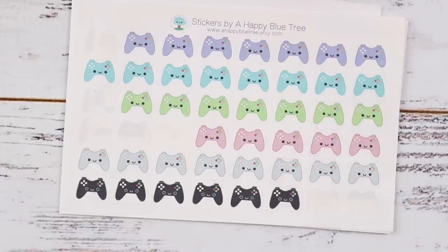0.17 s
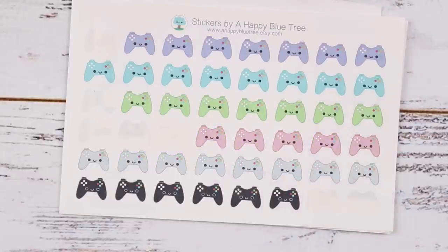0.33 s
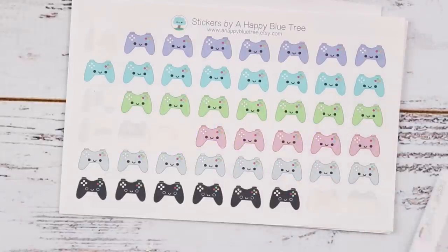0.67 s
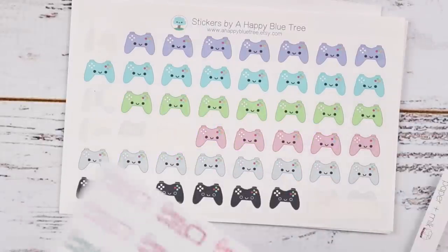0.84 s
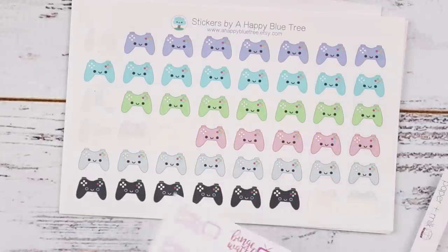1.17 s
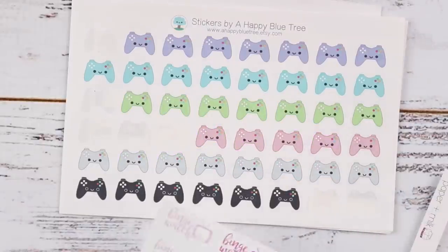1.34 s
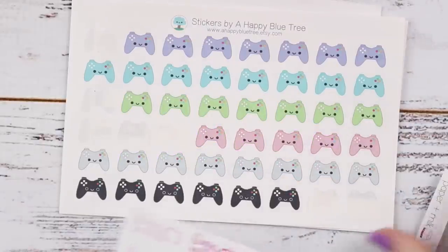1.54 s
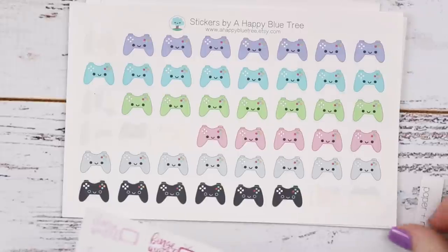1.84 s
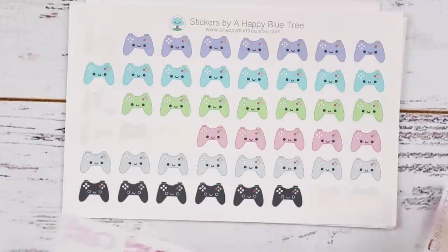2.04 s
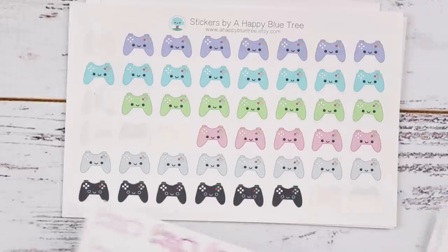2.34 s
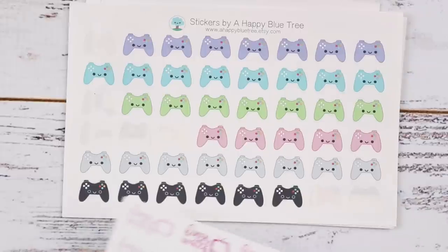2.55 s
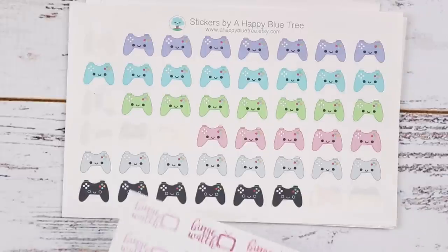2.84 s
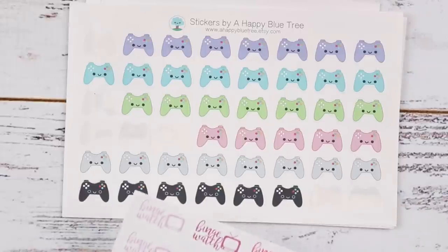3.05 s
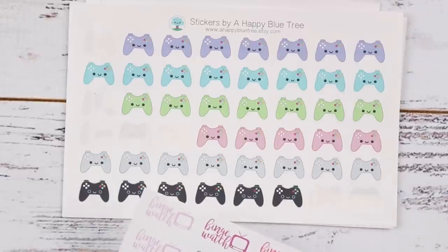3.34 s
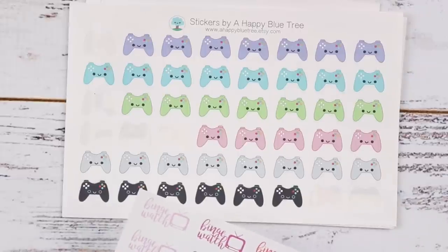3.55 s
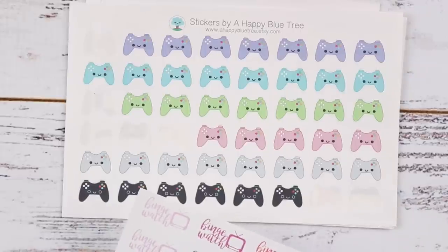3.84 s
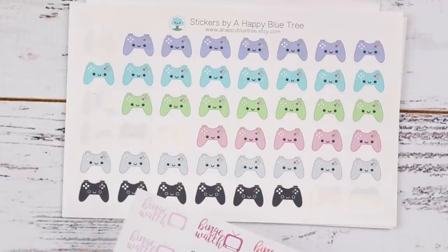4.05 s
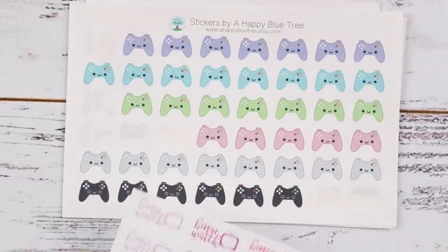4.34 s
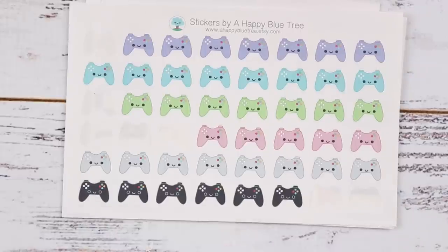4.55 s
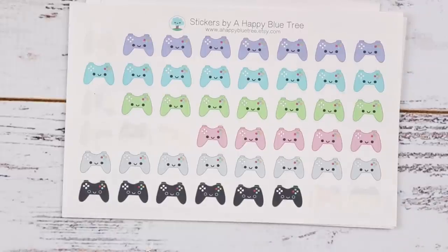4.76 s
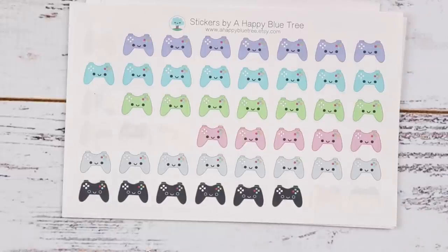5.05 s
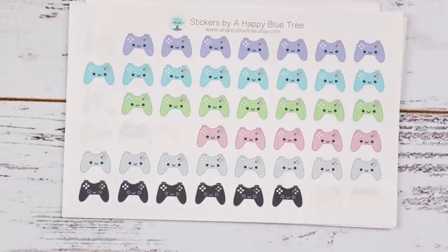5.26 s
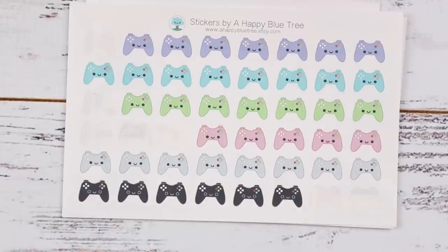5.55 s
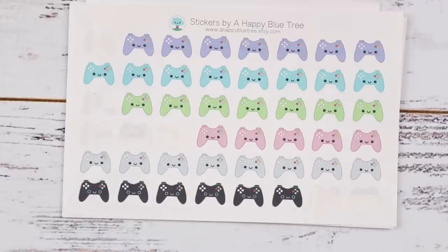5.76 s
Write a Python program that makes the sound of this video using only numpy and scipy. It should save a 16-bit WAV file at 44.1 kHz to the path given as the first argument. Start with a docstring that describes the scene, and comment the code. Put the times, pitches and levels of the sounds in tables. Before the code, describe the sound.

Close stereo pickup of sticker sheets being handled on a hollow wooden table in a quiet small room, leaning slightly left. From 0 to 0.6 s, short dry paper scrapes come in quick strokes, with a crisp flick near 0.5 s, then a light slide fades. At about 1.05 s a soft bump leads to the loudest moment at 1.15 s: a sharp snap and hard woody knock, with a run of small bouncing taps. Another snap and low double thud follow at 1.4 s, then dragging. Around 2.05 s bright paper crackles burst out, with a hissy slide, and a knock rattles at 2.24 s. A quiet stretch of faint rubbing follows. Dull thumps land at 3.4 and 3.6 s. After that there is mostly faint rustling, a tiny tap at 4.45 s, and small ticks and soft slides from 5 to 5.7 s over faint airy room noise.

```python
"""Sheets of sticker paper slide under sorting hands on a hollow wooden table in a quiet room, heard close by.
Stick-slip friction rings each sheet and hisses; buckling sheets snap as short rattles of noise.
Fingers and stacks knock, bounce and drag on the table, which drums as a sum of decaying modes.
Two microphone ports hear this with level and time steps, sparse echoes and a shaped room noise."""
import sys
import numpy as np
from scipy import signal
from scipy.fft import rfft, irfft, next_fast_len
from scipy.io import wavfile
from scipy.ndimage import uniform_filter1d, map_coordinates

SR = 44100
rng = np.random.default_rng(int(sys.argv[2]) if len(sys.argv) > 2 else 0)


def generate_wav(sig):
    """Save sig (samples, or channels by samples) to the path in sys.argv[1] as 16-bit PCM at SR."""
    pcm = np.round(np.clip(np.atleast_2d(sig).T, -1, 1) * 32767).astype(np.int16)
    wavfile.write(sys.argv[1], SR, pcm)


N = 260705
T = np.arange(N) / SR

# sheets sliding: full_strength_s, swell_s, hold_s, fade_s, scrape_db, hiss_db,
# stiffness (factor on the sheet's resonances)
SLIDES = [(0.046, 0.0084, 0.04, 0.079, -29, -41.5, 1.017), (0.273, 0.0045, 0.045, 0.022, -50, -53, 0.84),
          (0.314, 0.015, 0.022, 0.01, -40, -47, 0.98), (0.354, .01, 0.0084, .02, -42.5, -42.5, 0.71),
          (0.385, 0.01, 0.004, 0.01, -30.5, -34.5, 0.977), (0.397, 0.0064, 0.0041, 0.017, -31, -40, 1),
          (0.417, .01, 0.061, .02, -43.5, -46, 1.02), (0.435, 0.009, 0.00015, 0.0071, -25, -52, 1.35),
          (.492, 0.0094, 0.003, 0.0073, -23.5, -38.5, 1.3), (0.519, 0.0055, 0.0041, 0.0068, -27, -26, 0.88),
          (0.53, 0.011, 0.033, 0.078, -43, -49, 1.02), (0.691, 0.053, 0.048, 0.25, -49.5, -48.5, 1.11),
          (1.157, .01, 0.011, 0.15, -45, -49, 0.97), (1.307, 0.023, 0.089, 0.021, -57, -53, .86),
          (1.468, 0.063, 0.056, 0.049, -50, -44, 0.8), (2.029, 0.025, 0, 0.0074, -44.5, -48, 0.93),
          (2.064, 0.0062, 0.001, 0.043, -28, -50, 0.93), (2.142, 0.045, 0, 0.2, -40, -35.5, 0.77),
          (2.432, 0.073, .11, 0.13, -53, -47, 1.17), (2.623, 0.26, 0.1, 0.03, -58.5, -86, 0.99),
          (2.867, 0.0084, 0.0016, 0.019, -56, -52, 0.72), (2.955, 0.1, 0.008, 0.031, -52.5, -48.5, 1.12),
          (3.083, 0.064, 0.0026, 0.019, -55, -43.5, 1.1), (3.247, 0.054, 0.00018, 0.036, -64, -55, 1.16),
          (3.393, 0.013, 0.0089, 0.034, -49.5, -54, 0.99), (3.481, 0.085, 0.08, 0.061, -70, -50, 1.01),
          (3.616, 0.042, 0.059, 0.049, -54.5, -50, 1.13), (3.7, 0.015, 0.033, 0.031, -71, -54.5, 1.4),
          (3.762, 0.016, 0.029, 0.046, -54.5, -52, 1.14), (3.792, 0.008, 0.000021, 0.012, -66, -48, 1.62),
          (3.862, 0.036, 0.049, 0.043, -66, -60.5, 1.29), (4.455, 0.0083, 0.0043, 0.045, -53.5, -53, 1),
          (4.546, 0.0087, 0.032, 0.067, -54.5, -69, 0.85), (4.814, 0.022, 0.013, 0.26, -61, -65, 1.12),
          (5.052, 0.11, 0, 0.009, -47.5, -74, 1.44), (5.076, 0.013, 0.16, 1, -58.5, -59, 0.94),
          (5.247, 0.0063, 0.063, 0.052, -53, -44, 1.11), (5.357, 0.031, 0.04, 0.02, -54.5, -53.5, 1),
          (5.58, 0.023, 0.023, 0.021, -51, -67, 0.9), (5.612, 0.06, 0.024, 0.025, -58.5, -50, 1.03),
          (5.677, 0.029, 0.036, 0.017, -54.5, -52, 0.96)]
# resonances of a sheet: pitch_hz, width_hz, relative_level_db
SHEET_RESONANCES = [(425, 133, -2.5), (1406, 780, 6), (2406, 230, 10), (3150, 514, 8.5), (4090, 1300, -6),
                    (6680, 920, -0.5), (10600, 590, -25)]
# spectrum of the sliding hiss: pitch_hz, relative_density_db
HISS_SPECTRUM = [(1760, -15.5), (3000, -7.5), (3890, -6), (4700, -9), (6480, -4.5), (11100, -6.5),
                 (15300, -19.5), (16000, -28)]
# buckling sheets: start_s, ring_peak_db, ring_hz, treble_db (above the ring's peak), t60_s
SNAPS = [(0.293, -36, 1300, -2, 0.008), (0.523, -15, 2480, -7, 0.01), (0.649, -36.5, 2160, 12.5, 0.013),
         (1.047, -41, 1350, 9.5, 0.026), (1.1095, -24.5, 3060, -6, 0.0075),
         (1.1521, -7.5, 1350, -8.5, 0.0095), (1.212, -33, 1220, 1, 0.022), (1.3051, -28, 1700, 7, 0.0082),
         (1.3354, -27.5, 1070, 4.5, 0.031), (1.4019, -12, 2930, -13, 0.0089), (1.412, -34, 2900, -6, 0.006),
         (1.4177, -22, 3320, -8, 0.0054), (1.4668, -26, 1130, -1.5, 0.016),
         (1.6317, -24, 2870, -12, 0.0031), (2.0529, -15, 2080, -1, 0.015), (2.0573, -15, 3020, 6, 0.01),
         (2.0795, -10.5, 8200, -2, 0.017), (2.146, -19, 2160, 2.5, 0.016), (2.1512, -28, 2570, -3, 0.014),
         (2.2392, -27, 1290, 2, 0.027), (2.3871, -27.5, 2260, -30, 0.015), (3.39, -29.5, 990, -20.5, 0.025),
         (3.598, -33.5, 2000, -15, 0.008), (4.453, -48.5, 1170, 0, 0.023),
         (4.977, -35.5, 2770, -22, 0.0034), (4.992, -39, 1320, 0, 0.023), (5.0459, -29.5, 2370, 0, 0.0095),
         (5.239, -29, 1390, 4, 0.0084), (5.244, -29, 1460, -5, 0.016), (5.257, -38, 1500, -4, 0.008),
         (5.283, -33, 2480, 7, 0.011), (5.3635, -30, 2800, -18, 0.0054), (5.388, -45, 1600, -1, 0.008),
         (5.401, -41, 2000, -1, 0.0089)]
# treble of a snap: pitch_hz, relative_density_db
SNAP_TREBLE = [(2060, -18), (3500, -5.5), (4930, -9), (8260, -3), (9090, -3), (14500, -13), (16000, -27.5)]
# knocks on the table: start_s, nominal_peak_db, contact_ms
KNOCKS = [(1.046, -29, 2.5), (1.1524, -5, 0.24), (1.159, -15, 0.27), (1.184, -20, 0.5), (1.217, -22, 0.53),
          (1.233, -17.5, 0.6), (1.262, -22.5, 1.1), (1.307, -30, 1.5), (1.335, -22, 2.3),
          (1.403, -17.5, 0.21), (1.4124, -11.5, 5.1), (1.428, -12, 2.9), (1.453, -24.5, 3.4),
          (1.661, -27, 2.1), (2.056, -27.5, 0.4), (2.24, -13.5, 0.29), (2.251, -16, 0.99),
          (2.273, -18, 1.4), (2.297, -27, 0.5), (2.416, -33, 3.9), (3.389, -21, 1.8), (3.601, -19.5, 1.45),
          (3.627, -29, 2), (3.641, -30.5, 1.7), (4.452, -46, 0.61), (4.551, -44, 0.33), (4.568, -46, 1.4),
          (4.994, -42, 1.4), (5.059, -36.5, 0.38), (5.39, -41, 0.82)]
# hands and stacks dragging on the table, and the bounce and rattle after knocks:
# full_strength_s, swell_s, hold_s, fade_s, drumming_db,
# hardness_db (on the upper modes), arm_weight_db (on the deepest modes)
DRAGS = [(0.049, 0.027, 0.077, 0.035, -57, 3.5, -25), (0.515, 0.34, 0, 0.13, -64, 13.5, -20),
         (.788, 0.31, 0, 0.053, -56.5, -3.5, -1), (1.05, 0.0042, 0.011, 0.07, -33.5, -12.5, -10),
         (1.152, 0.004, 0.042, 0.11, -34.5, 10.5, -5), (1.303, 0.0039, 0.029, 0.17, -26.5, -12.5, -8),
         (1.416, 0.0071, 0.062, 0.14, -30, -5, -5.5), (1.639, 0.1, 0.056, 0.078, -41.5, -3.5, 5),
         (1.961, 0.013, 0.039, 0.021, -47.5, -3.5, -4.5), (2.05, 0.0027, 0.03, 0.14, -36.5, -22, -5.5),
         (2.22, 0.2, 0.0065, 0.0059, -40.5, -1.5, -13), (2.246, 0.0023, 0.048, 0.13, -24.5, -7, -23),
         (2.363, 0.029, 0.029, 0.035, -36.5, -8.5, -10), (2.984, 0.023, 0.0092, 0.07, -45.5, -16, 5.5),
         (3.38, 0.087, 0.04, .01, -43.5, -11, 3.5), (3.402, 0.0048, 0, 0.38, -36, -8.5, -4.5),
         (3.48, 0.024, 0.096, .02, -51, -2, -16), (3.589, 0.0044, 0.04, 0.029, -39, -11, -27),
         (3.663, .01, 0.029, 0.03, -51, -6, -19), (4.449, 0.0033, 0.0077, 0.028, -55, 3, -15),
         (4.616, 0.34, 0, 0.069, -61, 4.5, -10), (5.249, 0.0022, 0.0073, 0.033, -44.5, -23, 3),
         (5.31, 0.014, 0.13, 0.062, -60.5, 3.5, 5)]
# modes of the table top: pitch_hz, relative_level_db, t60_s
TABLE_MODES = [(130.2, -8.5, 0.12), (157, -16, 0.21), (195, -6, 0.087), (260.4, -2.5, 0.094),
               (293.4, 1.5, 0.11), (345.4, -8, 0.074), (388, -10, 0.12), (439, -16, 0.29),
               (495.3, -4.5, 0.12), (541.4, -0.5, 0.088), (593, -4.5, 0.055), (672, -3.5, 0.081),
               (723, -5.5, 0.086), (776, -10, 0.072), (852, -17.5, 0.086), (933, -17, 0.045),
               (1048, -15.5, 0.058), (1233, -0.5, 0.024), (1335, -10.5, 0.034), (1520, -11, 0.035),
               (1820, -14.5, 0.027), (2165, -16, 0.027)]
# where the hands are: time_s, left_over_right_db, right_delay_ms
HAND_PLACE = [(0, -4.5, 0.00082), (.6, -4.5, 0.0012), (1.0, -3.5, 0.07), (2.1, -1.5, 0.073),
              (2.5, -3.5, 0.016), (3.3, -4, 0.041), (4.2, -3, 0.031), (5.2, -4.5, 0.03), (5.9, -4, 0.01)]
# dullness of the right port: pitch_hz, loss_db
RIGHT_PORT_LOSS = [(1500, 1), (5000, 0), (9000, 4)]
# phase scatter of a wide sheet: pitch_hz, spread_rad
PHASE_SCATTER = [(2000, 0.2), (6000, 1.3)]
# share of the paper sound sent to nearby surfaces: pitch_hz, level_db
PAPER_ECHO = [(1000, 0), (4000, -7.5), (10000, -4)]
# decay of the echoes: pitch_hz, t60_s
ROOM_DECAY = [(200, 0.13), (1000, 0.085), (4000, 0.16), (12000, 0.091)]
# spectrum of the room noise: pitch_hz, relative_density_db
AIR_SPECTRUM = [(12, -44), (20, 17), (48, -4.5), (117, -11), (237, -13.5), (323, -8.5), (416, -8.5),
                (452, -14), (913, -17), (1510, -17), (5360, -26), (7950, -23), (8650, -22.5), (15200, -31),
                (16500, -63)]
# left-right likeness of the room noise: pitch_hz, correlation
AIR_LIKENESS = [(60, 0.76), (240, 0.37), (950, 0.39), (3770, 0.033), (15000, 0.043)]

STROKE_DB = 20  # fall over one swell or fade time
BEND = 0.96  # exponent; above 1, a stroke would linger near its top and die faster at its ends
BRIGHT_HZ, BRIGHT_DB = 8900, 35  # a stiffer sheet hisses brighter: dB above this pitch per unit of stiffness
SNAP_RISE_S, KNOCK_RISE_S = 0.00081, 0.0012
CRACK = 1.55  # the instant a snap reaches full strength, in times the rattle's rms
TICK_BELOW_DB = -20  # a snap with less treble than this is a bare tick
RING_WIDTH, TICK_WIDTH = 0.22, 0.15  # resonance width as share of the ring's pitch
DEEP_HZ, UPPER_HZ = 170, 420  # deepest modes lie below, upper modes above
KNOCK_DEEP_DB = -7.5  # fingers push the deepest modes less
SHIFTS_PER_S = 9  # turns through the three echo tails
AIR_DB = -53
WHINE_HZ, WHINE_DB = 7950, -75
EDGE_HZ = 16300


def slide():
    """Stick-slip friction: fibres catch and let go, ringing the sheet and hissing as the grip wavers."""
    grip = flutter(hz=40, depth_db=1.5)
    slips = grains(per_s=2500, spread_db=2.0, smooth=0.49)
    fine_slips = grains(per_s=2500, spread_db=2.0, smooth=1.2)
    hiss = evened(coloured(fine_slips + 0.019 * slips, HISS_SPECTRUM))
    treble = signal.sosfiltfilt(signal.butter(2, BRIGHT_HZ, "high", fs=SR, output="sos"), hiss)
    out = np.zeros(N)
    for *motion, scrape_db, hiss_db, stiffness in SLIDES:
        span, gain = stroke(*motion)
        scrape = np.zeros(len(gain))
        for hz, width, db in SHEET_RESONANCES:
            pitch = stiffness * hz
            scrape += amp(db) * resonate(resonate(slips[span], pitch, width), pitch, 2 * width)
        brightness = amp(BRIGHT_DB * (stiffness - 1))
        bright_hiss = hiss[span] + (brightness - 1) * treble[span]
        out[span] += gain * (amp(scrape_db) * evened(scrape) + amp(hiss_db) * bright_hiss)
    return grip * out


def snaps():
    """Buckling: a short rattle of noise excites a resonance of the sheet and spits treble."""
    out, t = np.zeros(N), np.arange(3000) / SR
    noise = rng.standard_normal((len(SNAPS), 2, len(t)))
    noise[..., round(SNAP_RISE_S * SR)] = CRACK
    for (s, peak_db, hz, treble_db, t60), (ring_noise, treble_noise) in zip(SNAPS, noise):
        decay = amp(-60 * np.maximum(t - SNAP_RISE_S, 0) / max(t60, .002))
        shape = decay * np.minimum(t / SNAP_RISE_S, 1)
        ring = resonate(ring_noise * shape, hz, RING_WIDTH * hz)
        if treble_db < TICK_BELOW_DB:
            ring = resonate(resonate(ring, hz, TICK_WIDTH * hz), hz, RING_WIDTH * hz)
        # the treble falls away below its lowest point
        spectrum = [(SNAP_TREBLE[0][0] / 2, -30.0)] + list(SNAP_TREBLE)
        spit = coloured(treble_noise * shape, spectrum)
        snap = ring / abs(ring).max() + amp(treble_db) * spit / abs(spit).max()
        add(out, s, amp(peak_db) * snap)
    return out


def table():
    """Modal superposition: knocks, bounces and drags excite decaying sine modes of the table top."""
    hz, db, t60 = np.transpose(TABLE_MODES)
    t = np.arange(SR // 2) / SR
    rings = amp(db[:, None] - 60 * t / t60[:, None]) * np.sin(2 * np.pi * hz[:, None] * t)
    drumming = knocks(hz, t, rings) + drags_and_bounces(hz, t, rings)
    # a bare top radiates little in the deep bass
    return signal.sosfilt(signal.butter(3, 85, "high", fs=SR, output="sos"), drumming)


def knocks(hz, t, rings):
    """Impact excitation: the striking place weighs the modes, and longer contact spares the upper ones."""
    out = np.zeros(N)
    places = amp(2.1 * rng.standard_normal((len(KNOCKS), len(hz))))
    # beyond a nodal line a mode starts in the opposite direction
    places *= np.sign(rng.random(places.shape) - .3)
    finger_push = amp(KNOCK_DEEP_DB * (hz < DEEP_HZ))
    for (s, peak_db, contact_ms), place in zip(KNOCKS, places):
        contact = 1 / (1 + (hz * contact_ms / 1000) ** 4)
        knock = (place * finger_push * contact) @ rings
        knock *= np.minimum(t / KNOCK_RISE_S, 1)
        # the peak is taken as 2.5 times the spread of the first 900 samples
        add(out, s, amp(peak_db) * knock / (2.5 * knock[:900].std()))
    return out


def drags_and_bounces(hz, t, rings):
    """Random excitation: bumps of dragging, bounce and rattle drive three groups of damped modes."""
    out, push = np.zeros(N), np.zeros((3, N))
    deep, upper = hz < DEEP_HZ, hz > UPPER_HZ
    for *motion, drag_db, hard_db, weight_db in DRAGS:
        span, gain = stroke(*motion)
        push[:, span] += gain * amp([[drag_db + weight_db], [drag_db], [drag_db + hard_db]])
    bumps = grains(per_s=600, spread_db=2.0, smooth=0.5)
    for modes, force in zip((deep, ~deep & ~upper, upper), push):
        # a resting hand damps the top, so these ring shorter than knocks
        damped = rings[modes].sum(0) * amp(-100 * t) * np.minimum(t / 0.0016, 1)
        out += signal.fftconvolve(force * bumps, damped / np.linalg.norm(damped))[:N]
    return out


def ports(x, extra_ms):
    """Stereo cues: the place of the source sets a level and time step between two ports."""
    pan_db, late_ms = curves(HAND_PLACE)
    right = map_coordinates(x, [np.arange(N) - (late_ms + extra_ms) * SR / 1000], order=3)
    right = scattered(coloured(right, [(hz, -loss_db) for hz, loss_db in RIGHT_PORT_LOSS]))
    return np.array([x * amp(pan_db / 2), right * amp(-pan_db / 2)])


def scattered(x):
    """Extended source: a wide sheet sounds from many points, so phase wanders from band to band."""
    n = next_fast_len(len(x))
    hz = np.fft.rfftfreq(n, 1 / SR)
    wander = np.interp(hz, np.linspace(0, SR / 2, 40), rng.standard_normal(40))
    return irfft(rfft(x, n) * np.exp(1j * wander * read(PHASE_SCATTER, hz)), n)[:len(x)]


def room(x):
    """Reverberation: three sparse tails take turns, so echoes keep changing colour and differ left from right."""
    taps = np.zeros((3, 2, SR // 2))
    # one tap of random sign in every 20 samples
    starts = np.arange(20, SR // 2 - 20, 20)
    at = starts + rng.integers(0, 20, (3, 2, len(starts)))
    np.put_along_axis(taps, at, rng.choice([-1., 1.], at.shape), 2)
    # each band dies at its own speed
    hz, t, z = signal.stft(taps, SR, nperseg=256)
    decay = amp(-60 * t / read(ROOM_DECAY, hz)[:, None])
    tails = signal.istft(z * decay, SR, nperseg=256)[1]
    tails /= np.linalg.norm(tails[0, 0])
    phase = SHIFTS_PER_S * T + np.arange(3)[:, None] / 3
    turns = np.sqrt(2 / 3) * np.cos(2 * np.pi * phase)
    return signal.fftconvolve((x * turns)[:, None], tails, axes=2).sum(0)[:, :N]


def air():
    """Diffuse field: patchy noise, most alike left and right in the bass, under a faint fuzzy tone."""
    frames, hz = N // 256 + 5, np.fft.rfftfreq(1024, 1 / SR)
    a, b, c, d, patches = rng.standard_normal((frames, 513, 5)).T
    patches = evened(uniform_filter1d(uniform_filter1d(patches, 10, 0), 10, 1))
    likeness = np.clip(read(AIR_LIKENESS, hz), -1, 1)[:, None]
    left = a + 1j * b
    right = likeness * left + np.sqrt(1 - likeness ** 2) * (c + 1j * d)
    z = np.array([left, right]) * amp(read(AIR_SPECTRUM, hz)[:, None] + 1.3 * patches)
    hush = evened(signal.istft(z, nperseg=1024, noverlap=768)[1][:, :N])
    whine = evened(resonate(resonate(rng.standard_normal(N), WHINE_HZ, 40), WHINE_HZ, 60))
    return amp(AIR_DB) * hush + amp(WHINE_DB) * whine


def stroke(s, swell, hold, fade):
    """Envelope: gain swells, holds and fades; returns the samples covered and the gain."""
    span = slice(max(round((s - 3 * swell) * SR), 0), round((s + hold + 3 * fade) * SR))
    before = (s - T[span]) / max(swell, .001)
    after = (T[span] - s - max(hold, 0)) / max(fade, .001)
    away = np.maximum(before, after)
    return span, amp(-STROKE_DB * np.maximum(away, 0) ** BEND)


def grains(per_s, spread_db, smooth):
    """Shot noise: random clicks of uneven size over a share of smooth noise."""
    size = amp(spread_db * np.minimum(rng.exponential(1, N), 4)) * rng.choice([-1., 1.], N)
    clicks = evened(size * (rng.random(N) < per_s / SR))
    return clicks + smooth * rng.standard_normal(N)


def flutter(hz, depth_db):
    """Amplitude modulation: low-passed noise makes a level waver at random up to about hz."""
    waver = signal.lfilter(*signal.butter(2, hz, fs=SR), rng.standard_normal(N))
    return amp(depth_db * evened(waver))


def resonate(x, hz, width):
    """Simple resonance: a two-pole filter of gain 1 at its peak."""
    return signal.lfilter(*signal.iirpeak(hz, hz / width, SR), x)


def coloured(x, points):
    """Linear filtering: weighs the spectrum of x by the dB curve through the points."""
    n = next_fast_len(x.shape[-1])
    gain = amp(read(points, np.fft.rfftfreq(n, 1 / SR)))
    return irfft(rfft(x, n) * gain, n)[..., :x.shape[-1]]


def amp(db):
    """Decibel law: 20 dB is a factor of ten in amplitude."""
    return 10 ** (np.asarray(db) / 20)


def evened(x):
    """Normalisation to an rms of 1."""
    return x / np.sqrt(np.mean(x ** 2) + 1e-20)


def read(points, hz):
    """Interpolation of a table along logarithmic pitch."""
    f, value = np.transpose(points)
    return np.interp(np.log(hz + 1), np.log(f + 1), value)


def curves(rows):
    """Interpolation of each column along time."""
    s, *columns = np.transpose(rows)
    return [np.interp(T, s, c) for c in columns]


def add(mix, s, sound):
    """Superposition: adds a sound to the mix from s seconds on."""
    part = mix[..., round(s * SR):][..., :sound.shape[-1]]
    part += sound[..., :part.shape[-1]]


def scene():
    """Superposition of direct paper and table sound, echoes and room noise at the two ports."""
    rub, snap, wood = slide(), snaps(), table()
    # the bass of the table reaches both ports alike; its upper modes come from the side
    bass = signal.sosfiltfilt(signal.butter(3, 480, fs=SR, output="sos"), wood)
    upper = wood - bass
    paper_send = coloured(rub + amp(-2.5) * snap, PAPER_ECHO)
    echoes = room(paper_send + amp(-2.0) * upper + amp(-19.5) * bass)
    direct = bass + ports(rub + snap, extra_ms=0) + ports(upper, extra_ms=0.089)
    return direct + echoes + air()


def record(dry):
    """Band limitation: the recorder passes only what lies below its upper edge."""
    low_pass = signal.firwin(255, EDGE_HZ, window=("kaiser", 9), fs=SR)
    return signal.oaconvolve(dry, low_pass[None], "same")


dry = scene()
out = record(dry)
generate_wav(out)
```